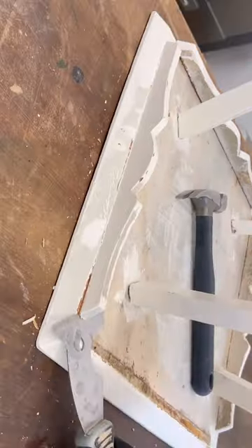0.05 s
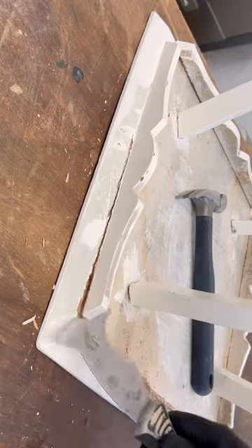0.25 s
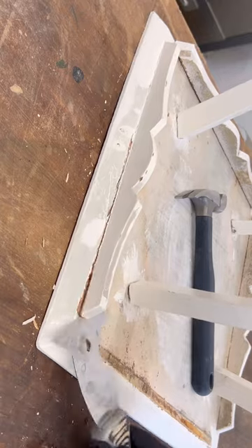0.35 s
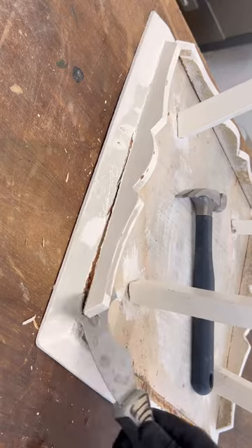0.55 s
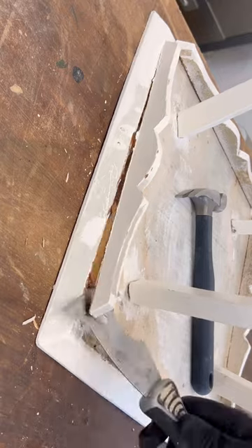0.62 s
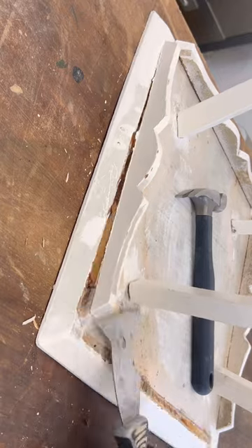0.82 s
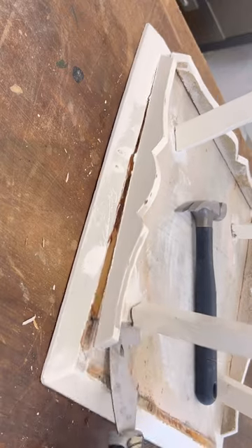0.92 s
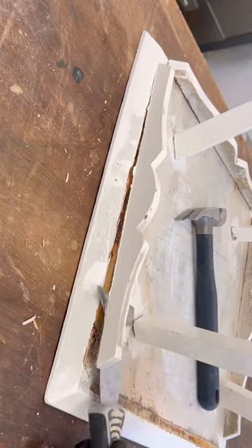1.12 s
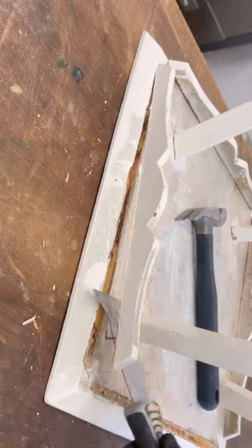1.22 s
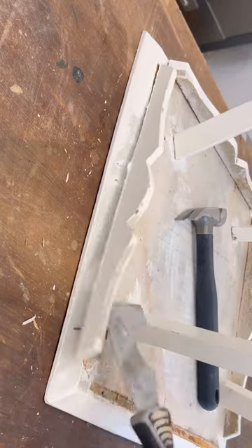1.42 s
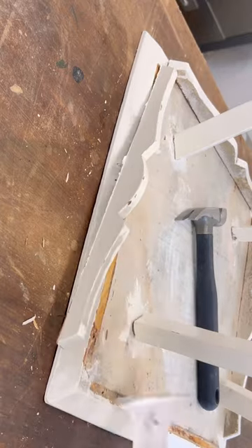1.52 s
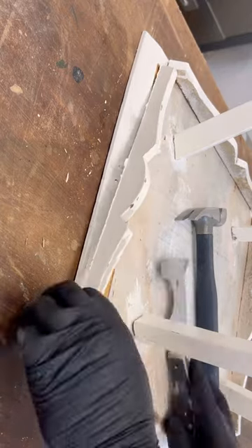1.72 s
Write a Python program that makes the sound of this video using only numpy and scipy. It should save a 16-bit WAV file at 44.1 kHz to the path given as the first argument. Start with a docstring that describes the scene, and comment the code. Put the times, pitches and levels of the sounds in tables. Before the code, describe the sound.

Wood cracks sharply as a steel scraper levers it apart, then taps and scrapes the seam.

```python
"""A steel scraper levers a painted wooden joint apart on a workbench, close up in a small room.
After a faint scrape, paint and glue let go in sharp cracks that ring the boards. The loudest, at 0.23 s,
overloads the microphone; more follow from 0.48 to 0.64 s. From 0.83 s the blade knocks and scrapes
along the open seam. A thin machine whine and faint room noise lie underneath throughout."""
import sys
import numpy as np
from scipy import signal
from scipy.fft import rfft, irfft
from scipy.io import wavfile
from scipy.ndimage import uniform_filter1d

SR = 44100
rng = np.random.default_rng(int(sys.argv[2]) if len(sys.argv) > 2 else 0)


def generate_wav(sig):
    """Save sig (samples, or channels by samples) to the path in sys.argv[1] as 16-bit PCM at SR."""
    pcm = np.round(np.clip(np.atleast_2d(sig).T, -1, 1) * 32767).astype(np.int16)
    wavfile.write(sys.argv[1], SR, pcm)


N = 77175

# thud, mid, reference and top bands of a contact: (frequency [Hz])
BANDS_HZ = [450, 1300, 4000, 10000]
# colour of the struck boards: (frequency [Hz], spectral level [dB])
WOOD_COLOUR = [(40, -41.5), (150, -30.5), (280, -9.5), (420, 5.5), (750, 4), (1000, 4), (1650, 3.5),
               (2400, -1.5), (3700, 0.5), (5400, -4.5), (6200, -6.5), (8300, -9.5), (10000, -17),
               (15500, -20)]
# modes of the boards: (frequency [Hz], level [dB], t60 [s])
BOARD_MODES = [(270, 0, .12), (388, -7, .16), (534, -3, .12), (752, 0, .14), (822, 0, .16), (1088, -7, .2),
               (1194, -2, .18), (1538, -6, .2), (1680, -2, .15), (1996, -1, .15), (2810, -3, .13),
               (3390, -2, .11), (3648, 1, .1), (5293, 0, .16)]
BOARD_MODES_DB, TOP_HZ = -12.5, 15750


def blows():
    """Cracks and knocks: brief tearing, then spot, boards and blade ring. Returns (direct, room feed)."""
    # (time [s], level [dB], thud [dB], mid [dB], top [dB], ring t60 [s], room send [dB],
    #  blade ring [dB], blade brightness [dB], resonance of the struck spot [Hz])
    hits = [(0.013, -42.5, 23.5, 4.5, 2, 0.11, -4.5, -40, -10.5, 400),
            (0.027, -49, 9.5, 6, 8, 0.014, 4, -30, -7, 250),
            (0.035, -48, 8, -3, -40, 0.047, -13, -34, -4, 3380),
            (0.207, -57.5, -32, -9, 4, 0.015, 8, -25, 0, 4500),
            (.2268, -31, -7, -15, -1.5, 0.024, 12.5, -51, 0, 5100),
            (.2284, -5, -11.5, -5, -1, 0.068, -6, -32, -16, 777),
            (0.4838, -22, -8.5, 2, -3.5, 0.025, -7, -5, -35, 7200),
            (0.496, -35.5, 7, 6, 9, 0.1, -5.5, -13.5, -25, 2150),
            (.549, -46, 11, 1, 12, 0.017, -2, -8, 0, 3300),
            (0.6143, -19.5, -11.5, -7, 1.5, 0.033, -4, -25.5, -3.5, 906),
            (0.6325, -14, 0, -5, 8.5, 0.049, -5, -35, -18, 804),
            (0.642, -22, 6.5, 10, 1, 0.035, -5, -28.5, -7, 578),
            (0.859, -36.5, 2, -4, 4.5, 0.1, -5.5, -15, 19, 4240),
            (.934, -44, 0, 8.5, 15, 0.056, 3.5, -25, 0, 604),
            (0.9436, -32.5, 9, -4, -5.5, 0.094, -3, -34, -4, 3750),
            (1.106, -36, 7, 1, -5, 0.012, -5.5, -11, 9, 4700),
            (1.128, -34, -1, -1.5, -4, 0.066, -2.5, -27, -6, 5000),
            (1.195, -38.5, 16, 3, 4, 0.098, -8, -25, 0, 433),
            (1.218, -34.5, 0.5, -3, -11, 0.13, -5.5, -20, -9, 745),
            (1.274, -34, 0, 9, 7, 0.063, -2, -7, -22, 1310),
            (1.3171, -28, -3.5, -8, -3.5, 0.077, -4.5, -5.5, -11, 3100),
            (1.373, -27, -1, -2.5, 0, .07, -4, -7.5, 14, 8050),
            (1.3873, -25, -0.5, 7.5, 2, 0.07, -6.5, -9.5, 13, 1100),
            (1.3925, -37.5, -3, 10, -33, .05, 3.5, -37, -3, 1470),
            (1.444, -40, -18, 3, 6, 0.09, -27, -26, -14, 2130),
            (1.485, -38, 10.5, 5, 5.5, .05, -1, -31, 8, 1060)]
    # modes of the blade: (frequency [Hz], level [dB], t60 [s])
    blade_modes = [(1890, -4, .1), (2067, -3, .2), (2160, -2, .16), (2330, -6, .12), (2837, -4, .2),
                   (3160, -2, .14), (3310, -4, .12), (4199, -9, .08), (6083, -14, .1), (7192, -3, .16),
                   (7900, -15, .1)]
    # blade brightness ramp: (start [Hz], end [Hz])
    tilt_hz = [3300, 6500]
    rise_s, spot_t60_cycles = 0.00017, 14.3
    highpass = signal.butter(2, 250, "high", fs=SR, output="sos")
    direct, feed = np.zeros(N), np.zeros(N)
    for at_s, db, thud_db, mid_db, top_db, t60_s, room_db, blade_db, bright_db, spot_hz in hits:
        tone_db = (thud_db, mid_db, 0, top_db)
        boards = undb(BOARD_MODES_DB) * ring(BOARD_MODES)
        spot = undb(-4.5) * ring([(spot_hz, 0, spot_t60_cycles / spot_hz)])
        tilt = list(zip(tilt_hz, (0, bright_db)))
        tilted_modes = [(hz, mode_db + along(hz, tilt), decay_s) for hz, mode_db, decay_s in blade_modes]
        blade = undb(blade_db) * ring(tilted_modes)
        rise = 1 - np.exp(-np.arange(len(boards)) / SR / rise_s)
        crack = flatten(rise * (burst(t60_s=0.018) + undb(-3.5) * burst(t60_s)))
        rings = signal.sosfilt(highpass, rise * (spot + blade))
        gain = undb(db) * np.sqrt(SR / 100)  # unit energy to RMS over 10 ms
        add(direct, at_s, gain * (wood(crack + boards, tone_db) + rings))
        click = signal.unit_impulse(len(boards))
        add(feed, at_s, gain * undb(room_db) * (wood(click + boards / 2, tone_db) + rings / 2))
    return direct, feed


def scrapes():
    """The edge sticks and slips at random over the paint, and at times locks into a squeal."""
    # (start [s], length [s], level [dB], thud [dB], mid [dB], top [dB], slip rate [1/s],
    #  squeal pitch [Hz], squeal level [dB])
    strokes = [(.005, 0.099, -60.5, 6, 1, -1, 400, 1500, -44),
               (0.829, 0.026, -51.5, -22.5, -46, 12, 690, 3300, -13),
               (1.054, 0.094, -46.5, 1.5, 8, 10, 1100, 1500, -4),
               (1.086, .009, -33, -6, -0.5, -11, 1000, 2154, -5),
               (1.093, 0.032, -37, -8, -8, 1.5, 1300, 2494, -24),
               (1.373, 0.024, -35, -4.5, -25, 4.5, 900, 2050, -2.5),
               (1.441, 0.061, -46, 1.5, 8, -4, 400, 2070, -9),
               (1.516, 0.02, -43, -1.5, 7, 8, 700, 1510, -20),
               (1.534, 0.024, -41.5, -2.5, 7, 11.5, 900, 1500, -6),
               (1.719, 0.017, -46, 1, 4.5, 8, 900, 1707, -5),
               (1.73, .035, -41.5, -1.5, 7.5, 9.5, 880, 1730, 1)]
    # colour of the dragging edge: (frequency [Hz], gain [dB])
    rasp_colour = [(250, 11.5), (500, 2.5), (900, -5), (2000, -1.5), (3200, -4), (5000, 1.5), (7500, 1.5),
                   (10000, 0.5), (14000, -21)]
    attack_s, release_s, catch_db = 0.001, 0.015, 4.5
    out, t = np.zeros(N), np.arange(N) / SR
    for at_s, length_s, db, thud_db, mid_db, top_db, slips_per_s, squeal_hz, squeal_db in strokes:
        tone_db = (thud_db, mid_db, 0, top_db)
        env = np.clip(t / attack_s, 0, 1) * np.clip((length_s - t) / release_s + .5, 0, 1)
        env *= undb(catch_db * drift(rate_hz=220))  # the edge catches and frees itself
        slips = (rng.random(N) < slips_per_s / SR) * undb(rng.standard_normal(N)) * env
        slip_response = flatten(burst(t60_s=0.006)) + undb(BOARD_MODES_DB) * ring(BOARD_MODES)
        friction = signal.fftconvolve(slips, slip_response)[:N]
        rasp = wood(colour(friction, rasp_colour), tone_db)
        stroke = rasp + undb(squeal_db) * squeal(squeal_hz, env, tone_db)
        add(out, at_s, stroke * undb(db) * np.sqrt(length_s * SR))
    return out


def squeal(hz, env, tone_db):
    """Locked stick-slip: rough, jittering harmonics coloured by the boards."""
    jitter, rolloff, rough_db = 0.009, 0.64, 3.5
    phase = 2 * np.pi * np.cumsum(hz * (1 + jitter * drift(rate_hz=846))) / SR
    tone = list(zip(BANDS_HZ, tone_db))
    partials = np.zeros(N)
    for k in range(1, int(TOP_HZ / hz) + 1):
        colour_db = along(k * hz, tone) + along(k * hz, WOOD_COLOUR) / 2
        partials += undb(colour_db) * np.sin(k * (phase + k)) / k ** rolloff
    return unit(env * undb(rough_db * drift(rate_hz=600)) * partials)


def wood(x, tone_db):
    """Colour of the boards, shifted per band by where and how hard the contact is."""
    return unit(colour(x, WOOD_COLOUR, list(zip(BANDS_HZ, tone_db))))


def burst(t60_s):
    """Decaying noise: countless fibres or close modes sounding at once."""
    env = fade(t60_s)
    return unit(env * rng.standard_normal(len(env)))


def ring(modes, size=22050):
    """Decaying modes with random phases."""
    t = np.arange(size) / SR
    return unit(sum(undb(db) * unit(fade(t60_s) * np.sin(2 * np.pi * (hz * t + rng.random())))
                    for hz, db, t60_s in modes))


def room(x, bands=9, build_s=0.007):
    """Diffuse tail of a small room; the highest treble dies first."""
    # room and bench favour the bass: (frequency [Hz], gain [dB])
    room_colour = [(150, 7), (300, 1.5), (600, 1), (1500, -4), (5000, -7), (14000, 0.5)]
    # room decay: (frequency [Hz], t60 [s])
    decay = [(150, 0.3), (500, 0.23), (1500, 0.55), (4000, 0.41), (8000, 0.41), (14000, 0.2)]
    size = SR * 2 // 3
    t, hz = np.arange(size) / SR, np.fft.rfftfreq(size, 1 / SR)
    centres_hz = np.geomspace(100, 16000, bands)
    spectrum = rfft(rng.standard_normal(size))
    tail = np.zeros(size)
    for centre_hz, weights in zip(centres_hz, np.eye(bands)):
        band = irfft(spectrum * along(hz, list(zip(centres_hz, weights))), size)
        tail += band * fade(along(centre_hz, decay), size)
    response = unit(tail * (1 - np.exp(-t / build_s)))
    return signal.fftconvolve(colour(x, room_colour), response)[:N]


def background(air_db=-59.5):
    """Faint room noise and a machine's steady whine, wavering by about 1 dB."""
    # room noise: (frequency [Hz], spectral level [dB])
    air_colour = [(30, -13), (90, -8), (140, -2.5), (250, -4), (400, -2), (700, -5), (1500, -12.5),
                  (3000, -14), (8000, -29), (15000, -29.5)]
    # machine tones: (frequency [Hz], level [dB])
    tones = [(1674, -67.5), (2654, -56.5)]
    t = np.arange(N) / SR
    air = unit(colour(rng.standard_normal(N), air_colour)) * np.sqrt(N) * undb(air_db)
    whine = sum(undb(db + drift(rate_hz=24)) * np.sin(2 * np.pi * hz * t) for hz, db in tones)
    return air + np.sqrt(2) * whine


def flatten(x, width_hz=500):
    """Level the broad spectrum, keep the fine resonances."""
    hz = np.fft.rfftfreq(len(x), 1 / SR)
    power = uniform_filter1d(np.abs(rfft(x)) ** 2, int(width_hz / hz[1]))
    gain_db = 10 * np.log10(power.mean() / power)
    return colour(x, np.column_stack([hz, gain_db])[1:])


def colour(x, *curves, size=2048):
    """Minimum-phase filter from summed (frequency [Hz], gain [dB]) curves."""
    hz = np.fft.rfftfreq(size, 1 / SR)
    gain_db = sum(along(hz, curve) for curve in curves)
    cepstrum = irfft(np.log(undb(gain_db)))
    cepstrum[1:size // 2] *= 2
    cepstrum[size // 2 + 1:] = 0
    return signal.fftconvolve(x, irfft(np.exp(rfft(cepstrum))))[:len(x)]


def along(hz, points):
    """Interpolate (frequency [Hz], value) points in log frequency."""
    points_hz, values = np.array(points, float).T
    return np.interp(np.log(np.maximum(hz, 1)), np.log(points_hz), values)


def fade(t60_s, size=22050):
    """Exponential decay."""
    return np.exp(-np.log(1000) * np.arange(size) / SR / max(t60_s, 1e-3))


def drift(rate_hz):
    """Random drift between knots of spread 1."""
    knots = rng.standard_normal(N)
    return np.interp(np.arange(N) / SR * rate_hz, np.arange(N), knots)


def undb(db):
    """Decibels to gain."""
    return 10 ** (np.asarray(db) / 20)


def unit(x):
    """Scale to unit energy."""
    return x / np.sqrt(np.sum(x ** 2) + 1e-18)


def add(out, at_s, x):
    """Mix x into out."""
    i = max(int(at_s * SR), 0)
    out[i:i + len(x)] += x[:max(N - i, 0)]


def scene():
    """Blows and scrapes, their room and the background; mono."""
    direct, feed = blows()
    scraping = scrapes()
    reverb = room(feed + undb(-7.5) * scraping)
    return (direct + scraping + reverb + background())[None]


def record(dry):
    """The recorder clips at full scale; the overload shifts its bias with a low thump; the top is cut."""
    thump_hz, thump_db = [30, 90], -6.5
    clipped = np.clip(dry, -1, 1)
    excess = np.abs(dry - clipped)
    thump = signal.sosfilt(signal.butter(2, thump_hz, "band", fs=SR, output="sos"), excess)
    lowpass = signal.ellip(8, .2, 70, TOP_HZ, fs=SR, output="sos")
    return signal.sosfilt(lowpass, clipped + undb(thump_db) * thump)


dry = scene()
out = record(dry)
generate_wav(out)
```